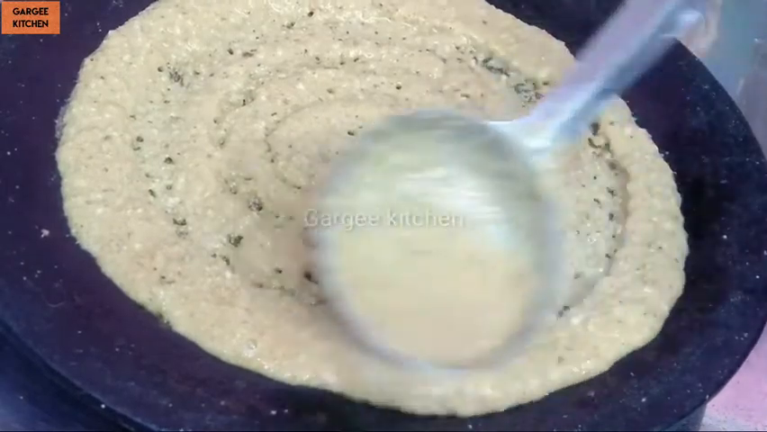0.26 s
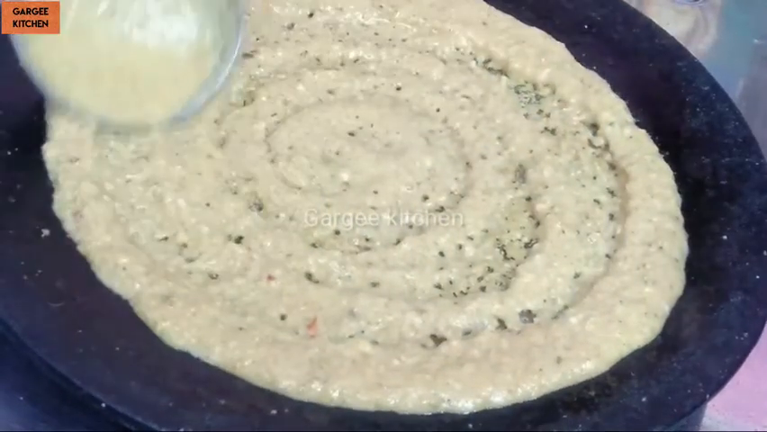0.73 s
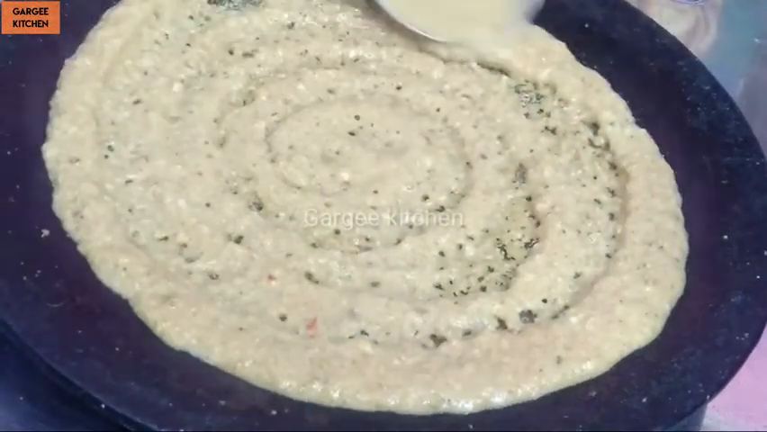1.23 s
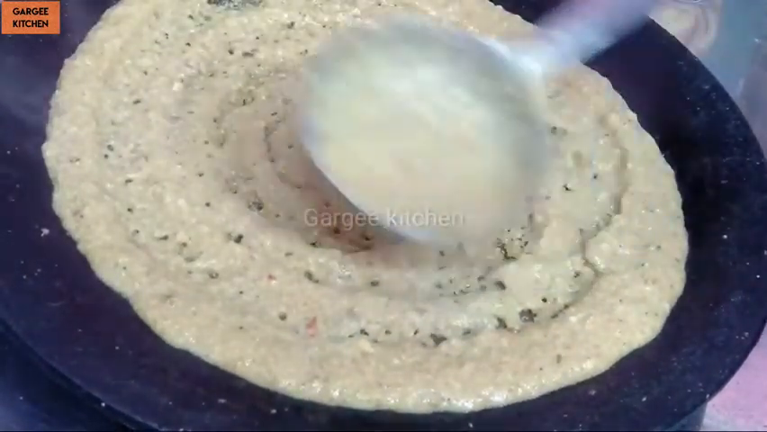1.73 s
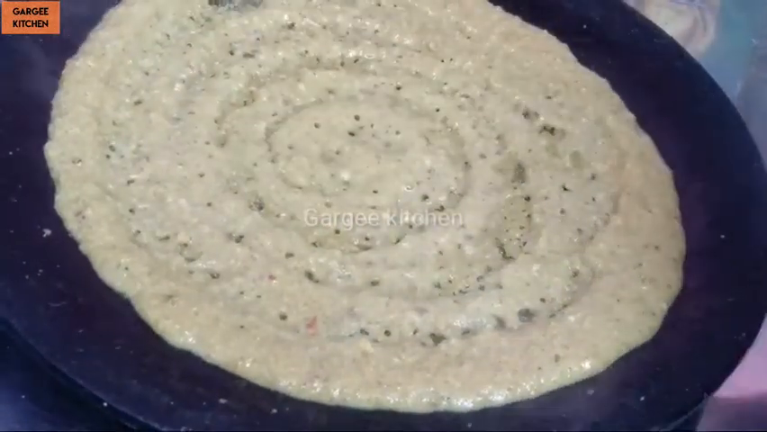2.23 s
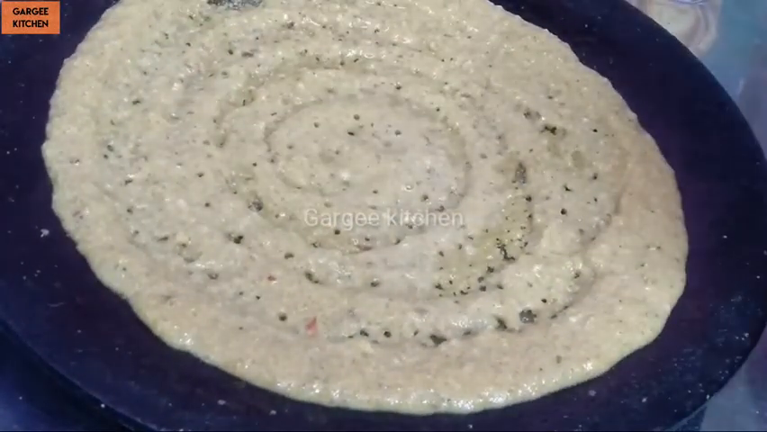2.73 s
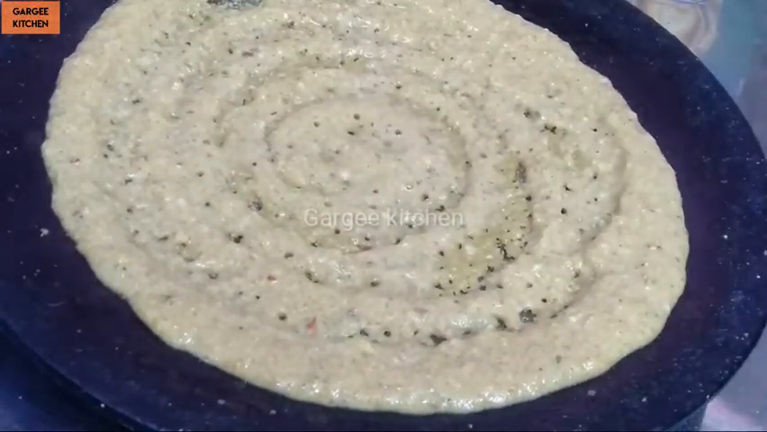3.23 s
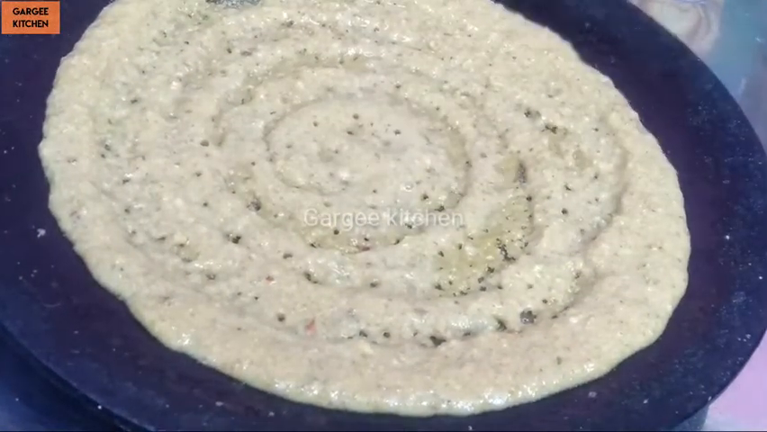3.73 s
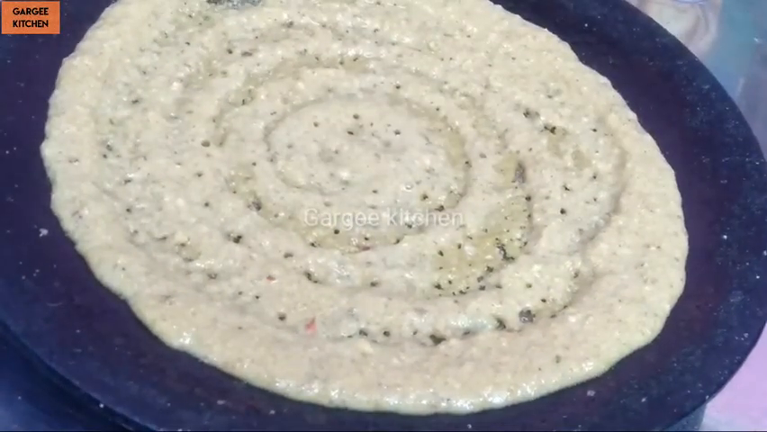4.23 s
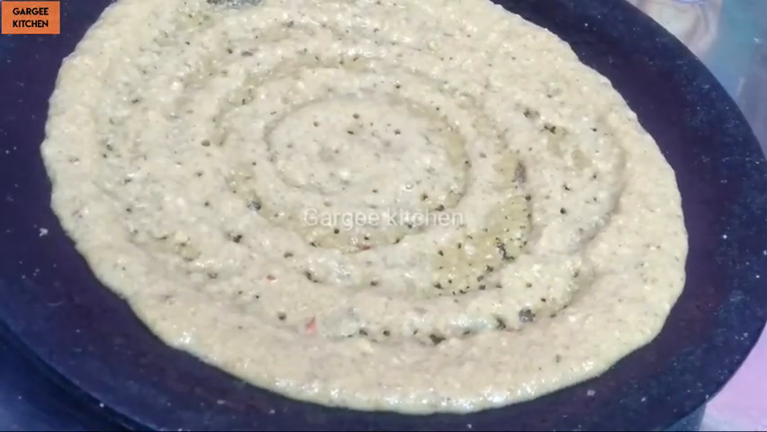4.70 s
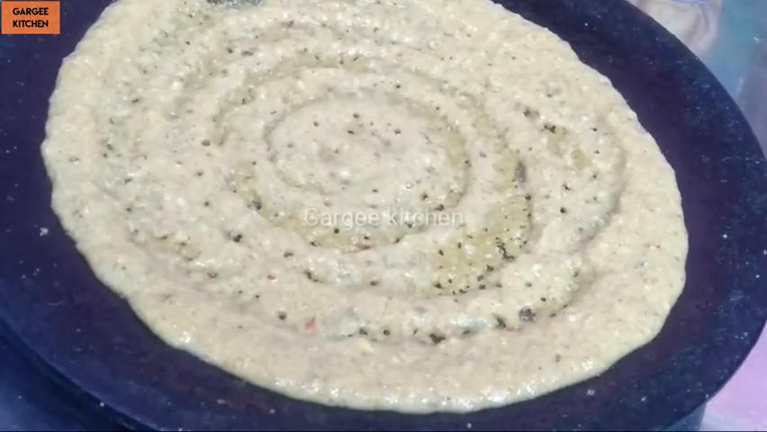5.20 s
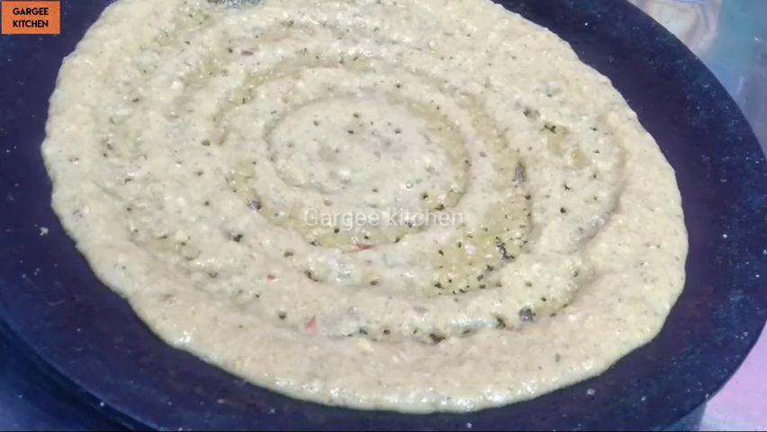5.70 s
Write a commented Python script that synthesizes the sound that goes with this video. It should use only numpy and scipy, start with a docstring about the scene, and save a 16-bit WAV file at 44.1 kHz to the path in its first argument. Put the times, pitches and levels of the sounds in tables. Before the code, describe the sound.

At 0 s a loud, wet, dense hiss of batter on a hot griddle fills the close, centred pickup, swelling slightly near 0.3 s as batter is spread. It falls steadily, leaving by about 3 s a fine, uneven crackle with scattered bright snapping pops, notably at 0.5, 1.7 and 3.6 s. Faint steel touches begin at 2.4 s, immediately followed by a sharp ladle clack, then small rattles and thin high clinks until about 3 s. At 3.9 s a metal vessel lands with a hollow thud, and again at 4.05 s, rocking into smaller knocks until 4.2 s, with a short ring and low boom. Dull rubbing follows to 4.7 s, with a light tick at 4.5 and soft knock at 4.65. Further soft rubs come around 4.8 and 5.3 s. Soft hollow plops sound at 5.2 and, stronger with a little spatter, 5.8 s. Low steady room tone and short kitchen reflections persist.

```python
"""In a small kitchen, close to a microphone, batter is spread on a hot griddle.
Random bubble clicks, filtered, form a wet hiss that dies away to a fine crackle; damped sines snap as pops.
A steel ladle is put aside with clacks and thin clinks: contact noise and decaying modes, roughened by chatter.
A vessel lands with a double thud: filtered blows, ringing wall and a low boom. Swelling tones plop softly,
and bands of noise rub dully, over a steady room tone. Synthetic reflections surround most of the sounds."""
import sys
import numpy as np
from scipy import signal
from scipy.io import wavfile

SR = 44100
rng = np.random.default_rng(int(sys.argv[2]) if len(sys.argv) > 2 else 0)


def wav_out(sig):
    """Save sig, one row per channel (or a flat mono array), as 16-bit PCM at SR to the path in sys.argv[1]."""
    wavfile.write(sys.argv[1], SR, np.round(np.clip(np.atleast_2d(sig).T, -1, 1) * 32767).astype(np.int16))


N = 262392
TIME = np.arange(N) / SR
RING_TIME = np.arange(SR * 3 // 4) / SR

# Spectrum of the wet hiss: (frequency [Hz], relative spectral density [dB per Hz])
STEAM_SPECTRUM = [(88, -43), (150, -30), (193, -32), (248, -27), (314, -5.5), (381, -18), (595, 2),
                  (812, -5), (1290, 1), (1510, -1), (1600, 2.5), (1940, -3.5), (4310, -5), (7000, -4.5),
                  (15500, -26)]
# Spectrum of the frying crackle: (frequency [Hz], relative spectral density [dB per Hz])
FRY_SPECTRUM = [(880, -38), (1500, -9), (1670, -8), (1990, -5), (2220, -4.5), (2640, -4.5), (3830, -2),
                (6070, -1.5), (6960, -6.5), (8970, -10.5), (11800, -14), (13300, -16), (14800, -16.5),
                (15500, -18.5)]
# Spectrum of the steady background: (frequency [Hz], relative spectral density [dB per Hz])
ROOM_SPECTRUM = [(18, -49), (30, -30), (129, -20.5), (207, -1.5), (361, -1.5), (518, -8), (544, 1),
                 (673, -2.5), (832, -0.5), (1500, -6.5), (1950, -30), (3300, -120)]
# The loudest bubbles: (time [s], level before filtering and room [dB, less 4], centre [Hz], spray level [dB])
LOUD_POPS = [(0.5212, -19, 6500, -7), (1.6503, -24.5, 7150, -9), (1.698, -22.5, 5900, -11),
             (1.7424, -18, 4270, -21), (2.663, -22.5, 4130, -12), (3.4155, -24.5, 5300, -16),
             (3.611, -20, 5740, -10), (4.358, -22.5, 5660, -16), (5.0717, -23.5, 5850, -18),
             (5.1416, -25.5, 5870, -21), (5.1520, -25.5, 5860, -13), (5.44, -24, 5500, -19),
             (5.4824, -25, 5680, -23), (5.4937, -24.5, 5700, -23), (5.5882, -30.5, 5490, -19),
             (5.657, -29.5, 4460, -7), (5.7401, -29, 4800, -18), (5.802, -19, 4730, -11)]
# Knocks of the ladle: (time [s], relative level [dB], low-pass corner [Hz], relative rattle level [dB])
LADLE_KNOCKS = [(2.4329, -1.5, 13000, -3.5), (2.4586, -12.5, 7000, -5), (2.595, -22.5, 3000, 10),
                (2.612, -26, 2500, 12.5), (2.936, -23.5, 2520, 6), (2.952, -20.5, 2800, 10),
                (2.969, -16, 3000, 3), (4.636, -24.5, 1500, -7)]
# Spectrum of a knock: (frequency [Hz], relative spectral density [dB per Hz])
KNOCK_SPECTRUM = [(100, -66), (200, -43), (280, -6.5), (370, -24.5), (560, -4), (800, -9), (1200, -1.5),
                  (1550, -10), (2000, -13.5), (2700, -17.5), (4200, -13), (6500, -16.5), (8300, -20.5),
                  (15000, -31)]
# Modes of the knocked body: (frequency [Hz], relative level [dB], 60 dB decay time [s])
KNOCK_MODES = [(290, -24, 0.12), (549, -5.5, .16), (782, -12, .12), (1024, -5.5, 0.16), (1236, 2, 0.14),
               (1362, -4, 0.083), (1944, -9, 0.17), (3710, -2.5, .06), (4360, -0.5, 0.022), (6086, 1, 0.05),
               (6858, 0, 0.043)]
# Light touches on the ladle: (time [s], relative level [dB], tilt [dB per octave], evenness of the modes [0-1])
LADLE_TOUCHES = [(2.379, -31, 7, 0), (2.641, -39.5, 2, 0), (2.677, -35.5, -1, 0.05), (2.725, -45, 10, 0),
                 (2.845, -42.5, -5.5, 1), (2.96, -29.5, 3, 0.2), (3.026, -34, 2.5, 0.4),
                 (4.464, -35.5, 1.5, 1)]
# Modes of the steel ladle: (frequency [Hz], relative level before evening and tilt [dB], 60 dB decay time [s])
LADLE_MODES = [(5490, -10, 0.45), (6110, -1.5, 0.27), (6650, -5.5, 0.33), (7850, -2.5, 0.3),
               (10530, -14, 0.34), (11700, -2, 0.28), (12100, -8, 0.2), (13600, -16, .28)]
# Landings of the rocking vessel: (time [s], relative level [dB], favoured note [Hz], relative base boom [dB])
LANDINGS = [(3.902, -1, 465, 0), (3.924, -12.5, 805, 2.5), (3.944, -8, 740, 4), (4.044, -16.5, 920, -20),
            (4.0495, -5.5, 956, -9), (4.073, -14.5, 870, 2), (4.091, -7.5, 610, 7),
            (4.128, -13.5, 1243, -26), (4.155, -17, 1230, -11)]
# Spectrum of a landing: (frequency [Hz], relative spectral density [dB per Hz])
LANDING_SPECTRUM = [(35, -60), (60, -33), (179, -23), (253, -10), (325, -7), (587, -6), (689, -6.5),
                    (755, 2), (1090, -4), (1280, -9), (1530, -15), (2840, -23), (3180, -16), (5490, -20),
                    (14000, -41)]
# Modes of the vessel's wall: (frequency [Hz], relative level [dB], 60 dB decay time [s])
WALL_MODES = [(384, 1.5, .34), (500, 3, .3), (579.7, 5, 0.53), (641, 1, 0.4), (745, 4, .3), (799, 5, .26),
              (855, 3, 0.36), (985, -1, 0.27), (1006, 0, .26), (1144, -1, 0.34), (1253, -2, .5),
              (1390, -2, .2), (1950, -18, .32)]
# Soft hollow plops: (time [s], level of the tone before the room [dB], pitch [Hz], swell time [s])
AIR_POCKETS = [(5.228, -30.5, 389, 0.0085), (5.813, -22.5, 402, 0.0055), (5.897, -32, 573, 0.0047),
               (5.94, -43, 560, 0.007)]
# Things slide on the counter: (time [s], length [s], level before fades and room [dB], centre [Hz],
# half width [natural log of frequency ratio])
RUBS = [(1.048, 0.16, -58.5, 210, 0.33), (2.803, 0.21, -53, 400, .7), (3.719, 0.1, -55, 215, 0.43),
        (4.24, 0.38, -51.5, 609, 0.13), (4.2, 0.51, -51, 1310, .7), (4.778, 0.13, -47, 423, 0.64),
        (5.248, 0.17, -50, 1060, 0.38), (5.28, 0.19, -53.5, 290, 0.55)]
# Decay of the kitchen's reflections: (frequency [Hz], 60 dB decay time [s])
ROOM_DECAY = [(200, 0.74), (530, 0.39), (1400, 0.28), (3700, 0.24), (10000, 0.14)]

EDGE_HZ = 15800
# the hiss falls steadily as the water boils off, down to a last trace
STEAM_START_DB, STEAM_FALL_DB_PER_S, STEAM_REST_DB = -32, 5, -53
# the crackle settles as the griddle cools under the batter
FRY_START_DB, FRY_SETTLED_DB, COOLING_S = -35.5, -48.5, 2.18
# the ladle pushes fresh batter onto bare iron
SURGE_S, SURGE_WIDTH_S, SURGE_DB = 0.26, 0.068, 2
# the many lesser bubbles: rate, then mean and spread of level, mean pitch, spray
SMALL_POPS_PER_S, SMALL_POP_DB, SMALL_POP_SPREAD_DB = 9, -31, 1.5
SMALL_POP_HZ, SMALL_SPRAY_DB = 5200, -17.5
# crunch time; energy share of the first instant at 0 dB; its loss in dB per dB of weaker blow
CONTACT_S, SHARP_SHARE, SOFTER_PER_DB = 0.0028, 0.64, 0.5
# harder landings are brighter: corner at 0 dB, and level change that doubles it
THUD_BRIGHT_HZ, BRIGHT_DB_PER_OCTAVE = 3920, 21
WALL_DB, WALL_GROWTH = -24.5, 1.67  # level at 0 dB; dB per dB of landing, so more than in proportion
GRIT_DB, GRIT_T60_S, GRIT_HZ = -35.5, 0.31, (1100, 2200)  # the base grinds on the counter
BASE_HZ = 267
# only a strong plop spatters: level in dB, growth in dB per dB of plop
SPLASH_DB, SPLASH_GROWTH, SPLASH_T60_S, SPLASH_HZ = 28, 2.45, 0.073, (3400, 9000)


def amp(db):
    """Logarithmic level: converts decibels to linear gain."""
    return 10 ** (np.asarray(db) / 20)


def evened(x):
    """Energy normalisation: scales a signal to rms 1."""
    return x / np.sqrt(np.mean(x ** 2) + 1e-20)


def unit_energy(x):
    """Energy normalisation: scales a pulse or impulse response to total energy 1."""
    return x / np.linalg.norm(x)


def read(points, hz):
    """Interpolation of a table on a logarithmic frequency axis."""
    table_hz, value = np.transpose(points)
    return np.interp(np.log(hz + 1), np.log(table_hz + 1), value)


def add(mix, s, sound):
    """Superposition: sums a sound into the mix from time s."""
    part = mix[round(s * SR):][:len(sound)]
    part += sound[:len(part)]


def colour(x, spectrum, size=4096):
    """Minimum-phase filtering: a causal response of unit energy follows the given spectrum."""
    level_db = np.maximum(read(spectrum, abs(np.fft.fftfreq(size, 1 / SR))), -100)
    log_gain = np.log(amp(level_db))
    # the Hilbert transform of the log gain supplies the minimum phase
    response = np.exp(np.conj(signal.hilbert(log_gain)))
    taps = np.fft.ifft(response).real[:size // 2]
    return signal.oaconvolve(x, unit_energy(taps))[:len(x)]


def band(x, hz, kind, order=1):
    """Butterworth filtering: gentle low-, high- or band-pass slopes."""
    return signal.sosfilt(signal.butter(order, hz, kind, fs=SR, output="sos"), x)


def bursts(per_s, spread_db, limit):
    """Poisson-like arrivals: random clicks of either sign, mostly small, a few large."""
    size = amp(spread_db * np.minimum(rng.exponential(1, N), limit))
    sign = rng.choice([-1, 1], N)
    present = rng.random(N) < per_s / SR
    return size * sign * present


def drift(hz):
    """Low-passed noise: slow random wandering of rms 1."""
    return evened(band(rng.standard_normal(N), hz, "low", order=2))


def ring(modes):
    """Modal superposition: each mode decays freely, with alternating initial sign."""
    total = np.zeros(len(RING_TIME))
    for k, (hz, db, t60) in enumerate(modes):
        decay = amp(db - 60 * RING_TIME / t60)
        total += (-1) ** k * decay * np.sin(2 * np.pi * hz * RING_TIME)
    return total


def jangle(modes, width_hz, rough):
    """Amplitude modulation of loose steel: chatter against its rest smears each spectral line."""
    total = np.zeros(len(RING_TIME))
    for mode in modes:
        flutter = evened(band(rng.standard_normal(len(RING_TIME)), width_hz, "low"))
        flutter = np.roll(flutter, len(flutter) // 2)  # moves the filter's start-up away from the onset
        total += ring([mode]) * (np.sqrt(1 - rough ** 2) + rough * flutter)
    return total


def contact(db, rattle_db, t60):
    """Impact: a sharp touch, milliseconds of crunch, then dying rattle; weak blows are less sharp."""
    crunch_noise, rattle_noise = rng.standard_normal((2, len(RING_TIME)))
    crunch = crunch_noise * np.exp(-np.minimum(RING_TIME / CONTACT_S, 20))
    rattle = rattle_noise * amp(-60 * RING_TIME / t60)
    share = np.clip(SHARP_SHARE * amp(SOFTER_PER_DB * db) ** 2, 0, 1)
    touch = signal.unit_impulse(len(RING_TIME))
    blow = np.sqrt(share) * touch + np.sqrt(1 - share) * unit_energy(crunch)
    return blow + amp(rattle_db) * unit_energy(rattle)


def rasp(band_hz, t60):
    """Decaying band noise: a quickly dying burst of grit or spatter."""
    noise = evened(band(rng.standard_normal(len(RING_TIME)), band_hz, "band"))
    return noise * amp(-60 * RING_TIME / t60)


def kitchen(x, wet_db):
    """Reverberation: dense reflections are added, each frequency band dying at its own rate."""
    hz, t, noise = signal.stft(rng.standard_normal(SR // 2), SR, nperseg=256)
    decay = amp(-60 * t / read(ROOM_DECAY, hz)[:, None])
    tail = signal.istft(noise * decay, SR, nperseg=256)[1]
    tail *= np.minimum(np.arange(len(tail)) / SR / 0.003, 1) ** 2  # reflections build up over 3 ms
    return x + amp(wet_db) * signal.oaconvolve(x, unit_energy(tail))[:N]


def room_tone():
    """Stationary noise: a steady background of fixed spectrum."""
    return amp(-54) * evened(colour(rng.standard_normal(N), ROOM_SPECTRUM))


def steam():
    """Incoherent summation: countless tiny bubbles under wet batter merge to hiss; larger ones blip."""
    fizz = colour(bursts(per_s=7000, spread_db=3, limit=3.4), STEAM_SPECTRUM)
    blips = np.zeros(N)
    for hz in np.geomspace(850, 1900, num=8):
        bubble = ring([(hz, 0, 30 / hz)])[:2048]  # falls 60 dB in 30 cycles
        blips += signal.oaconvolve(bursts(per_s=12, spread_db=1.5, limit=6.9), bubble)[:N]
    blips = amp(-9) * evened(band(blips, 600, "high", order=2))
    boiling = np.hypot(amp(STEAM_START_DB - STEAM_FALL_DB_PER_S * TIME), amp(STEAM_REST_DB))
    return boiling * evened(kitchen(evened(fizz) + blips, wet_db=-8.5))


def frying():
    """Modulated random impulses: bubbles crackle, in stronger clumps as the crust dries."""
    heat = np.exp(-TIME / COOLING_S)
    surge_db = SURGE_DB * np.exp(-((TIME - SURGE_S) / SURGE_WIDTH_S) ** 2)
    clumps = amp(2.87 * (1 - 0.45 * heat) * drift(hz=14))
    crackle = colour(bursts(per_s=1200, spread_db=1.8, limit=7.9) * clumps, FRY_SPECTRUM)
    level_db = FRY_SETTLED_DB + (FRY_START_DB - FRY_SETTLED_DB) * heat + surge_db
    return amp(level_db) * evened(kitchen(crackle, wet_db=-7.5))


def pop(db, hz, spray_db):
    """Damped oscillation: a large bubble snaps within a millisecond and spits a short noisy spray."""
    t = RING_TIME[:2048]
    snap = np.exp(-t * hz / 2) * np.sin(2 * np.pi * hz * t)
    spray_decay = amp(-5) * np.exp(-t / 0.0009) + amp(spray_db) * np.exp(-t / 0.009)
    burst = rng.standard_normal(len(t)) * spray_decay
    spray = band(burst, [hz * 0.62, hz * 1.2], "band")
    return amp(db + 4) * band(snap + spray, 13600, "low")


def pops():
    """Random arrivals: a few loud pops at set times among smaller ones that come by chance."""
    out = np.zeros(N)
    for s, db, hz, spray_db in LOUD_POPS:
        add(out, s + 0.001, pop(db, hz, spray_db))
    times = np.flatnonzero(rng.random(N) < SMALL_POPS_PER_S / SR) / SR
    for s in times:
        strength, pitch = rng.standard_normal(2)
        db = SMALL_POP_DB + SMALL_POP_SPREAD_DB * strength
        hz = SMALL_POP_HZ * np.exp(0.13 * pitch)
        add(out, s, pop(db, hz, SMALL_SPRAY_DB))
    return kitchen(band(out, 1200, "high", order=2), wet_db=-8)


def slides():
    """Sliding friction: brief bands of noise swell and fade as dull rubbing."""
    out = np.zeros(N)
    for s, length, db, hz, width in RUBS:
        noise = rng.standard_normal(int(length * SR))
        rub = band(noise, hz * np.exp([-width, width]), "band", order=3)
        add(out, s, amp(db) * evened(rub) * np.hanning(len(rub)))
    return kitchen(out, wet_db=-1.5)


def ladle():
    """Modal excitation: hard knocks ring briefly; light chattering touches wake only thin high modes."""
    knocks, clinks = np.zeros((2, N))
    body = jangle(KNOCK_MODES, width_hz=110, rough=0.6)
    for s, db, bright_hz, rattle_db in LADLE_KNOCKS:
        impact = colour(contact(db, rattle_db, t60=0.054), KNOCK_SPECTRUM)
        blow = amp(6) * impact + amp(-21.5) * body
        add(knocks, s, amp(db) * band(blow, bright_hz, "low"))
    onset = 1 + 0.51 * np.exp(-RING_TIME / 0.013)
    for s, db, tilt_db, even in LADLE_TOUCHES:
        modes = []
        for hz, mode_db, t60 in LADLE_MODES:
            woken_db = mode_db * (1 - even) + tilt_db * np.log2(hz / 10000)
            modes.append((hz, woken_db, t60))
        chatter = jangle(modes, width_hz=70, rough=0.85)
        add(clinks, s, amp(db - 4.0) * chatter * onset)
    knocks = kitchen(band(knocks, 257, "high", order=3), wet_db=-7.5)
    clinks = kitchen(band(clinks, 3000, "high"), wet_db=-4.0)
    return knocks + clinks


def vessel():
    """Impact and resonance: each landing thumps, grinds, rings the wall and pumps the base's low boom."""
    thumps, rings, boom = np.zeros((3, N))
    wall = ring(WALL_MODES)
    for s, db, favoured_hz, boom_db in LANDINGS:
        blow = colour(contact(db, rattle_db=-2.5, t60=0.082), LANDING_SPECTRUM)
        spot = amp(-20) * ring([(favoured_hz, 0, 0.05)])  # the spot that lands favours one note
        bright_hz = THUD_BRIGHT_HZ * 2 ** (db / BRIGHT_DB_PER_OCTAVE)
        add(thumps, s, amp(db + 12.0) * band(blow + spot, bright_hz, "low"))
        add(thumps, s, amp(GRIT_DB + db / 2) * rasp(GRIT_HZ, GRIT_T60_S))
        add(rings, s, amp(WALL_DB + WALL_GROWTH * db) * wall)
        add(boom, s, amp(boom_db - 29.0 - 60 * RING_TIME / 0.35))
    # the smoothed boom envelope drives one steady sine
    boom = band(boom, 43, "low") * np.sin(2 * np.pi * BASE_HZ * TIME)
    sound = kitchen(thumps, wet_db=-6) + kitchen(rings, wet_db=-17) + boom
    return band(sound, 195, "high", order=3)  # the bass below about 195 Hz falls away steeply


def plops():
    """Air-cavity oscillation: a pocket swells and dies within a few cycles, throwing a little spatter."""
    out = np.zeros(N)
    for s, db, hz, swell in AIR_POCKETS:
        u = RING_TIME / swell
        envelope = (u * np.exp(1 - u)) ** 2  # peaks at 1 after the swell time
        add(out, s, amp(db) * envelope * np.sin(2 * np.pi * hz * RING_TIME))
        spatter = np.minimum(u, 1) * rasp(SPLASH_HZ, SPLASH_T60_S)
        add(out, s, amp(SPLASH_DB + SPLASH_GROWTH * db) * spatter)
    return kitchen(out, wet_db=-11)


def scene():
    """Superposition: griddle, utensils and room tone sum alike in both channels."""
    griddle = steam() + frying() + pops()
    utensils = slides() + ladle() + vessel()
    mix = room_tone() + griddle + utensils + plops()
    return np.array([mix, mix])


def record(dry):
    """Band limitation: a linear-phase low-pass removes the extreme treble."""
    taps = signal.firwin(511, EDGE_HZ, window=("kaiser", 9), fs=SR)
    return signal.oaconvolve(dry, taps[None], "same", axes=1)


dry = scene()
out = record(dry)
wav_out(out)
```